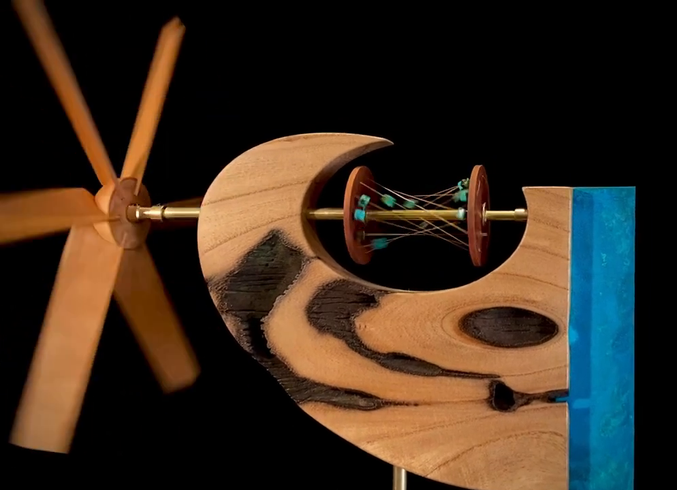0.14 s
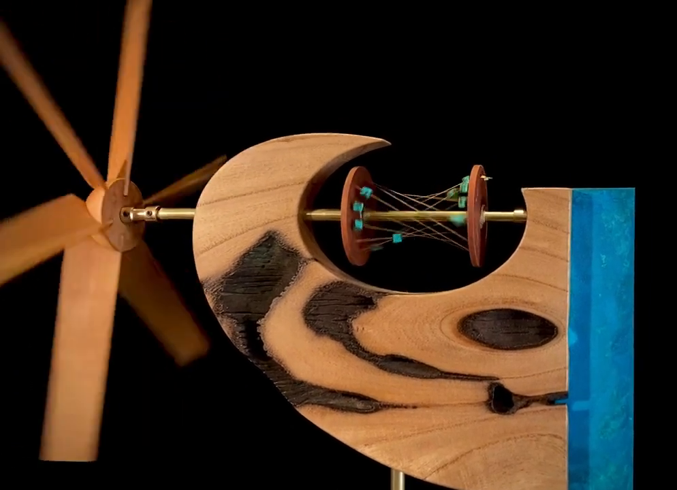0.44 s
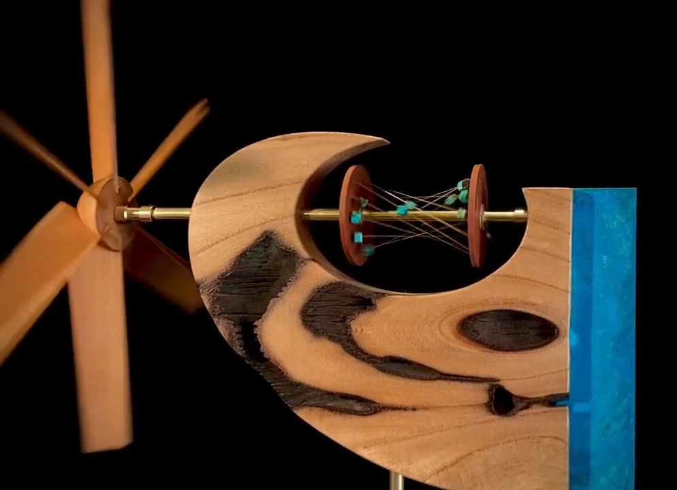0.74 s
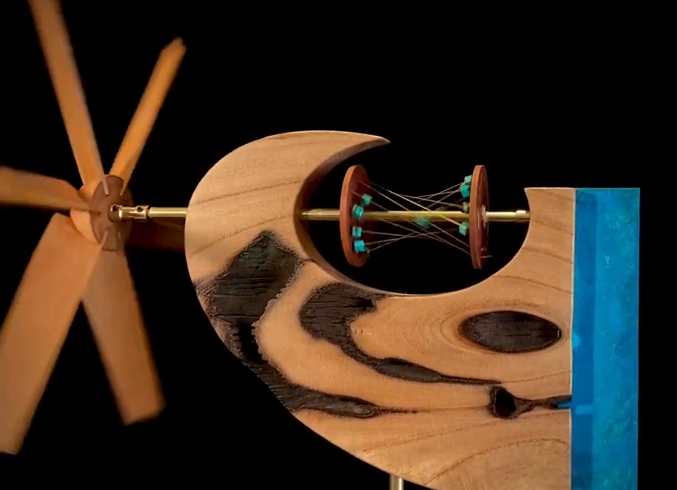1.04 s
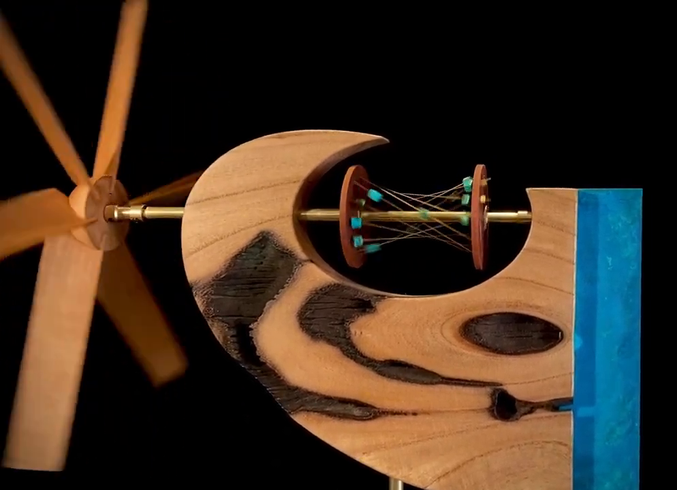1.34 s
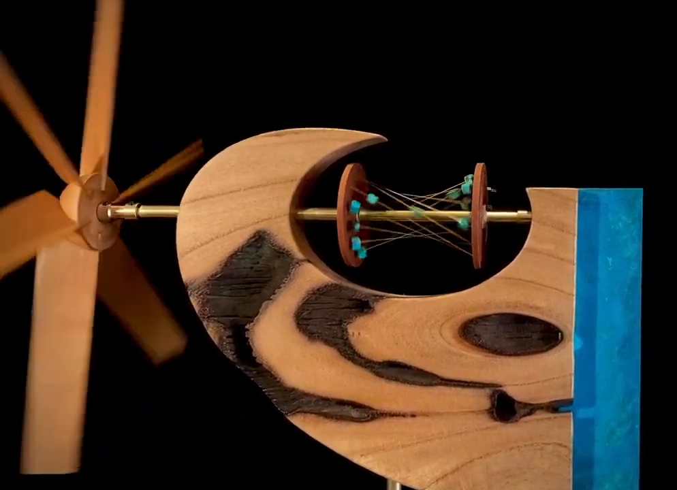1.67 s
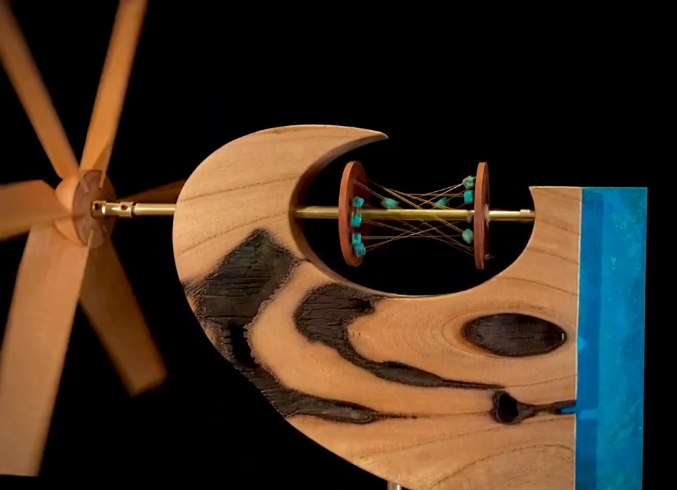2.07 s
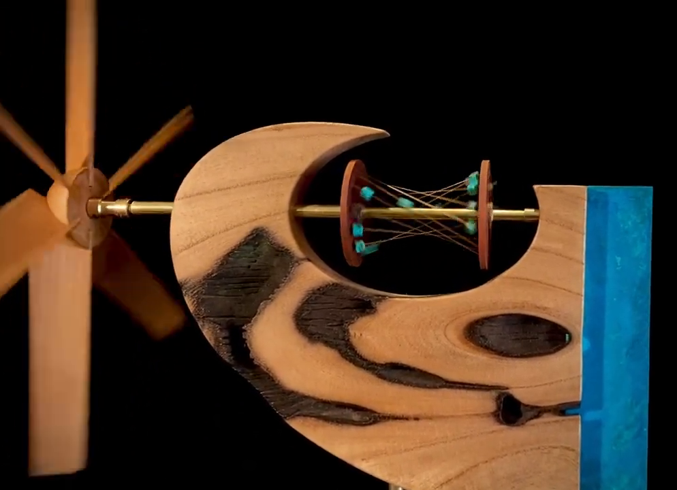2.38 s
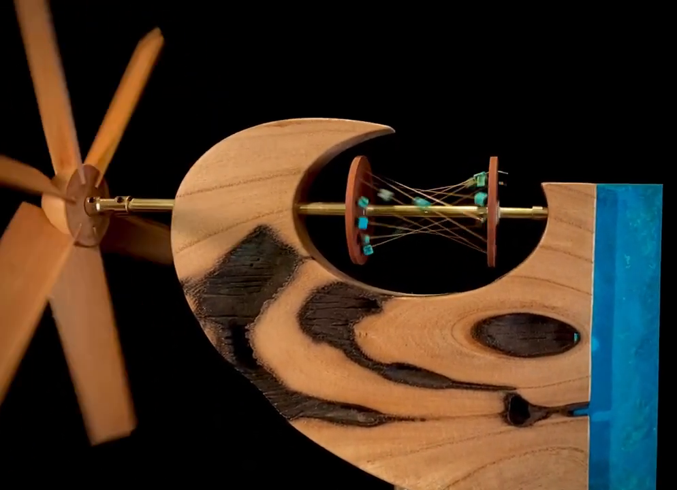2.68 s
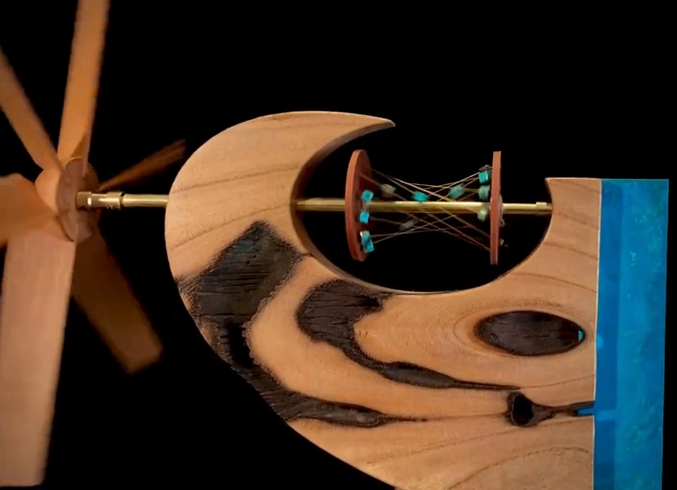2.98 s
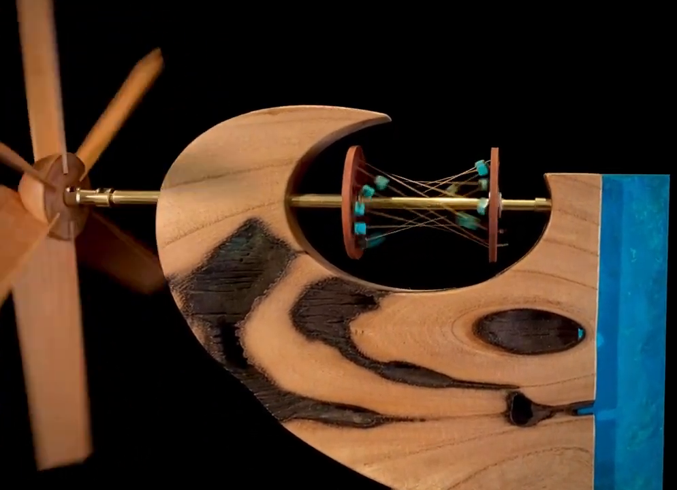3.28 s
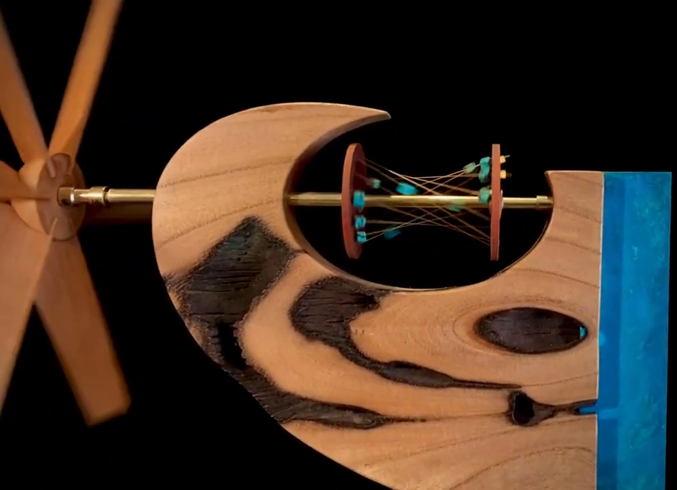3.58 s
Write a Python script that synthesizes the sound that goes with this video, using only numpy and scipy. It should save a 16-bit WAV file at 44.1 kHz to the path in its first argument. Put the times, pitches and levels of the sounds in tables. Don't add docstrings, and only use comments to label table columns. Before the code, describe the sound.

Beads on a turning wooden whirligig click against its discs, about seventeen uneven ticks a second throughout, some lightly ringing a brass shaft; faint fan hum and hiss behind, in a small room, close stereo microphone.

```python
import sys
import numpy as np
from scipy import signal
from scipy.fft import rfft, irfft, next_fast_len
from scipy.io import wavfile
from scipy.ndimage import uniform_filter1d, minimum_filter1d, map_coordinates

SR = 44100
rng = np.random.default_rng(int(sys.argv[2]) if len(sys.argv) > 2 else 0)


def inscribe(sig):
    pcm = np.round(np.clip(np.atleast_2d(sig).T, -1, 1) * 32767)
    wavfile.write(sys.argv[1], SR, pcm.astype(np.int16))


def field_ratio(decibels):
    return 10 ** (np.asarray(decibels, dtype=float) / 20)


N = 164052

# pitch_hz, level_db
CRACK_COLOUR = [(1500, -23), (3000, -10), (7500, -8), (8500, 5), (10800, -3), (13300, -2.5), (14600, -7.5),
                (16200, -14.5)]


def unit(x):
    return x / np.sqrt(np.mean(x ** 2) + 1e-20)


def along(points, hz):
    f, v = np.transpose(points)
    return np.interp(np.log(hz + 1), np.log(f + 1), v)


def wobble(rate):
    knots = rng.standard_normal(int(N * rate / SR) + 4)
    return map_coordinates(knots, [np.arange(N) * rate / SR])


def filtered(x, response):
    m = next_fast_len(x.shape[-1] + 4096)
    spectrum = rfft(x, m) * response(np.fft.rfftfreq(m, 1 / SR))
    return irfft(spectrum, m)[..., :x.shape[-1]]


def hiss(colour, shape):
    noise = rng.standard_normal(shape)
    return unit(filtered(noise, lambda hz: field_ratio(along(colour, hz))))


def lay(times, sounds):
    out, length = np.zeros((2, N + 2 * SR)), sounds.shape[-1]
    for s, sound in zip(times, sounds):
        start = SR + round(s * SR)
        out[:, start:start + length] += sound
    return out[:, SR:SR + N]


def blows():
    # start_s, crack_db, knock_db, shaft_ring_db
    blow_before = (-.004, -26, -32, -41)
    # start_s, crack_db, knock_db, shaft_ring_db
    early_blows = [(0.0811, -29.5, -35, -39.5), (0.0913, -29, -28, -45), (0.1601, -29.5, -35, -41),
                   (0.2346, -36.5, -34.5, -75), (0.3056, -30, -35.5, -51), (0.387, -36, -39, -58.5),
                   (0.4666, -35, -40.5, -67), (0.5168, -29.5, -27, -39.5), (0.5475, -27.5, -26, -36),
                   (0.6433, -31.5, -30, -52), (0.7157, -35.5, -39, -57), (0.7834, -29.5, -31.5, -51),
                   (0.9173, -31, -34, -62), (0.9631, -30, -28.5, -49), (0.9936, -24.5, -27, -34),
                   (1.0631, -25.5, -27, -34.5), (1.0828, -30.5, -29, -52), (1.1653, -28.5, -34.5, -41),
                   (1.3073, -28, -30.5, -49.5), (1.4074, -29, -34.5, -56), (1.4266, -35.5, -38, -58),
                   (1.4746, -29.5, -31.5, -50), (1.5652, -28, -28, -36.5), (1.6059, -26, -27, -34.5),
                   (1.6221, -31, -33, -51.5), (1.6856, -33, -30.5, -52), (1.7451, -27.5, -32.5, -46),
                   (1.8122, -29, -33, -66), (1.8789, -37.5, -35.5, -53), (1.8892, -29.5, -31.5, -59)]
    late_blows = [(1.9209, -30, -36.5, -73), (2.012, -30.5, -27, -52.5), (2.0456, -24.5, -24.5, -42.5),
                  (2.1387, -27.5, -25.5, -35.5), (2.1618, -33, -27, -63), (2.249, -29.5, -43, -41),
                  (2.2578, -28.5, -28.5, -49), (2.3453, -27, -32.5, -55), (2.4251, -38, -39, -54),
                  (2.4423, -29.5, -34.5, -51), (2.4514, -30.5, -40, -63), (2.5471, -34.5, -33, -61),
                  (2.6359, -32.5, -27.5, -35.5), (2.6571, -34, -35, -47), (2.6774, -25, -26, -37.5),
                  (2.7753, -25.5, -30, -47.5), (2.8227, -27, -31, -49), (2.8894, -27.5, -31, -56),
                  (2.941, -32.5, -32, -48), (2.9854, -29, -31, -50.5), (3.0304, -28, -35.5, -65),
                  (3.099, -30, -27, -51), (3.1558, -21, -28, -39), (3.1997, -30.5, -31, -34),
                  (3.2431, -31.5, -26.5, -60), (3.2767, -31, -31, -39), (3.3569, -23.5, -25.5, -44),
                  (3.4633, -28.5, -33, -54.5), (3.559, -31.5, -32, -47), (3.5813, -31, -38, -65)]
    # start_s, crack_db, knock_db
    rebounds = [(0.187, -48, -50), (0.3391, -46, -39), (0.822, -42, -37.5), (1.1927, -41, -42),
                (1.9, -39, -53), (0.349, -42, -36.5), (0.531, -43, -33.5), (0.562, -30, -32),
                (1.212, -32.5, -33), (2.0377, -33, -43), (2.56, -32.5, -32), (2.6927, -29, -30),
                (3.1438, -36, -36), (3.5205, -34.5, -37.5), (3.6877, -31.5, -30.5)]
    light = [(s, crack, knock, crack - 20) for s, crack, knock in rebounds]
    events = [blow_before] + list(early_blows) + list(late_blows) + light
    s, crack_db, knock_db, ring_db = np.transpose(events)
    return s, field_ratio(crack_db - 3), field_ratio(knock_db - 4.5), field_ratio(ring_db - 6.5)


def cracks(s, push, colour):
    strength = field_ratio(along(colour, np.fft.rfftfreq(4096, 1 / SR)))
    coloured = filtered(lay(s, push), lambda hz: field_ratio(along(colour, hz)))
    return coloured / np.sqrt(np.mean(strength ** 2))


def wood_knocks(gains, t, slow):
    # pitch_hz, level_db, fade_by_60_db_s
    wood_tones = [(1260, -19, 0.047), (1602, -18.5, 0.056), (1824, -16, 0.044), (2914, -15, 0.0047),
                  (2997, -3, 0.03), (3090, -5, 0.024), (3384, -9.5, 0.016), (3860, -7, 0.013),
                  (4424, -14, 0.033), (4990, -10.5, 0.041), (5400, -9, 0.023), (6880, -11.5, 0.0065)]
    scatter_db, detune = 2.5, 0.03
    hz, db, t60 = np.transpose(wood_tones)[:, None, :, None]
    z = rng.standard_normal((len(gains), len(wood_tones), 4))
    fade = field_ratio(db + scatter_db * z[..., :1] - 60 * t / (t60 * slow))
    rise = 1 - np.exp(-t / (0.0001 * slow ** 2))
    size = gains[:, None, None] * fade * rise
    turn = 2 * np.pi * hz * (1 + detune * z[..., 1:2]) * t
    return np.stack([(size * np.sin(turn + 4 * z[..., k:k + 1])).sum(1) for k in (2, 3)], 1)


def ticks(s, crack, knock, far, slow):
    # pitch_hz, level_db
    far_crack_colour = [(1500, -14.5), (3000, -17), (7600, -16.5), (8600, -2.5), (10800, 3.5), (13200, -5),
                        (14600, -12), (16200, -16)]
    crack_t60, rise_s = 0.015, 0.00011
    spike_db, spike_scatter_db = 9, 1.7
    t = np.arange(SR // 20) / SR
    envelope = field_ratio(-60 * t / (crack_t60 * slow)) * (1 - np.exp(-t / (rise_s * slow ** 2)))
    push = envelope * rng.standard_normal((len(s), 2, len(t)))
    scatter = spike_scatter_db * rng.standard_normal((len(s), 2, 3))
    push[..., 8:11] += field_ratio(spike_db - 20 * (slow - 1) + scatter) * [-.5, 1, -.5]
    push = crack[:, None, None] * push
    near_cracks = cracks(s[~far], push[~far], CRACK_COLOUR)
    far_cracks = field_ratio(1) * cracks(s[far], push[far], far_crack_colour)
    return near_cracks + far_cracks + lay(s, wood_knocks(knock, t, slow))


def tail(s, gains, colour, t60):
    rise_s = 0.00044
    t = np.arange(SR // 2) / SR
    fade = field_ratio(-120 * t / t60) * (1 - np.exp(-t / rise_s)) ** 2
    power = lay(s, gains[:, None, None] ** 2 * fade)
    return np.sqrt(power) * field_ratio(3.2 * wobble(90)) * hiss(colour, (2, N))


def whirligig():
    # delay_s, level_db, smear_times
    walls = [
        (.0108, -13, 1.5),
        (.027, -20, 2.2),
    ]
    # pitch_hz, level_db
    knock_tail_colour = [(1200, -19.5), (1850, -6.5), (2200, -31), (2800, 3.5), (3300, -13.5), (3700, -4.5),
                         (5600, -4.5), (9500, -28)]
    # pitch_hz, level_db
    far_tail_colour = [(1300, -11), (2000, -15.5), (2750, 6.5), (3600, -9), (7800, -17), (10800, -3.5),
                       (13000, -13), (16000, -34)]
    # pitch_hz, level_db
    shaft_colour = [(2600, -70), (3200, -32.5), (3560, -2), (3656, 3.5), (3720, -8.5), (3800, -1.5),
                    (4100, -22.5), (4800, -75)]
    crack_t60, knock_t60, shaft_t60 = 0.33, 0.25, 0.27
    s, crack, knock, ring = blows()
    far = ring < crack * field_ratio(-25)
    direct = ticks(s, crack, knock, far, 1)
    echoes = 0
    for delay, db, smear in walls:
        z = rng.standard_normal((len(s), 2))
        gain = field_ratio(db + 3 * z[:, 0])
        times = s + delay + 0.0004 * z[:, 1]
        echoes = echoes + ticks(times, crack * gain, knock * gain, far, smear)
    crack_tail = field_ratio(-24.5) * tail(s, crack * ~far, CRACK_COLOUR, crack_t60)
    knock_tail = field_ratio(-16.5) * tail(s, knock * ~far, knock_tail_colour, knock_t60)
    far_tail = field_ratio(-18.5) * tail(s, crack * far, far_tail_colour, crack_t60)
    shaft = tail(s, ring, shaft_colour, shaft_t60)
    return direct + echoes + crack_tail + knock_tail + far_tail + shaft


def fan_hum():
    # pitch_hz, level_db
    hum_tones = [(96.4, -60.5), (120, -61.5), (386, -74.5), (538, -88), (1007, -71)]
    t = np.arange(N) / SR
    hum = np.zeros(N)
    for hz, db in hum_tones:
        level = field_ratio(db + 3.0 + 2.5 * wobble(6.195))
        hum += level * np.sin(2 * np.pi * hz * t + 0.18 * wobble(5.04))
    return hum


def fan_air():
    # pitch_hz, level_db
    rumble_colour = [(22, -23), (55, -2.5), (106, -5.5), (135, -11), (220, -14), (320, -20.5), (500, -42)]
    # pitch_hz, level_db
    air_colour = [(150, -15.5), (700, 2.5), (1400, -1.5), (2300, 2), (4500, -7.5), (9000, -18.5),
                  (13000, -74)]
    rumble = field_ratio(-58 - wobble(3.9)) * hiss(rumble_colour, (2, N))
    air = field_ratio(-56 + 0.75 * wobble(4.06)) * hiss(air_colour, (2, N))
    return rumble + air


def draughts():
    # middle_s, level_db
    gusts = [(.13, -50), (.19, -50), (.245, -50), (.685, -43), (.83, -52), (1.42, -52), (1.685, -46),
             (2.84, -45)]
    # pitch_hz, level_db
    gust_colour = [(35, -14), (70, 0.5), (200, -3), (400, -12), (650, -30)]
    width_s = 0.0075
    t = np.arange(N) / SR
    swell = sum(field_ratio(db) * np.exp(-((t - s) / width_s) ** 2) for s, db in gusts)
    return swell * hiss(gust_colour, (2, N))


def scene():
    # pitch_hz, likeness_0_to_1
    likeness = [(100, 0.88), (300, 0.55), (900, .7), (3000, 0.65), (3600, .3), (5200, .6), (7500, 0.35),
                (8300, 0.94)]
    hum_in_first = fan_hum() * [[1], [0]]
    pair = whirligig() + fan_air() + draughts() + hum_in_first

    def shares(hz):
        like = np.clip(along(likeness, hz), 0, 1)
        return np.array([like, np.sqrt(1 - like ** 2)])

    right = filtered(pair, shares).sum(0)
    return np.array([pair[0], right])


def ports(dry):
    # pitch_hz, phase_radians
    left_leads = [(300, .1), (1000, 2.2), (1900, 3.9), (2900, 7.4), (5200, 6.8), (7500, 5), (8100, 2.9),
                  (9300, 2), (10700, .2), (15900, -6.2)]
    # pitch_hz, level_db
    left_over_right = [(200, 0.4), (700, 3), (1700, -1.5), (3600, 2.5), (5500, 4), (8000, 0.1)]
    # pitch_hz, level_db
    top_peak = [(15000, 0), (15700, 4), (15900, -2), (16500, -5)]
    side = np.array([[.5], [-.5]])

    def response(hz):
        shift = np.exp(1j * side * np.interp(hz, *np.transpose(left_leads)))
        level = field_ratio((side - 0.5) * along(left_over_right, hz))
        return shift * level * field_ratio(along(top_peak, hz)) * (hz < 16550)

    return filtered(dry, response)


def thinned_treble(x):
    # pitch_hz, level_db_per_bin
    mute_below = [(5500, -117), (7500, -93), (10500, -103), (13300, -90), (14500, -97), (15600, -97),
                  (16300, -80)]
    # pitch_hz, level_db
    masked_below = [(4000, -60), (5500, -35), (7000, -30), (8600, -24), (10500, -33), (13300, -21),
                    (15000, -23), (16300, -18)]
    scatter_db = 3
    hz, t, z = signal.stft(np.array([x[0] + x[1], x[0] - x[1]]) / 2, SR, nperseg=256)
    band_hz = hz[2::4]
    bands = np.mean(abs(z[:, :128].reshape(2, 32, 4, -1)) ** 2, axis=2)
    power = bands[:, 8:22].mean((0, 1))
    loud = -minimum_filter1d(-power, size=16, origin=4)
    limit = field_ratio(along(mute_below, band_hz))[:, None]
    limit = limit + np.sqrt(loud) * field_ratio(along(masked_below, band_hz))[:, None]
    waver = wobble(30)[::128][np.minimum(np.arange(len(t)), N // 128)]
    patches = rng.standard_normal((16, len(t) // 8 + 1))
    patches = np.repeat(patches, 2, 0).repeat(8, 1)[:, :len(t)]
    limit = limit * field_ratio(scatter_db * waver) * field_ratio(scatter_db * patches)
    is_open = uniform_filter1d(bands, size=3, axis=2) > limit ** 2
    z[:, :128] *= np.repeat(is_open, 4, axis=1)
    mid, side = signal.istft(z, SR, nperseg=256)[1][:, :N]
    return np.array([mid + side, mid - side])


def low_pass(x):
    return signal.sosfilt(signal.butter(12, 17160, fs=SR, output="sos"), x)


def record(dry):
    mix = thinned_treble(ports(dry))
    return low_pass(mix)


dry = scene()
out = record(dry)
inscribe(out)
```